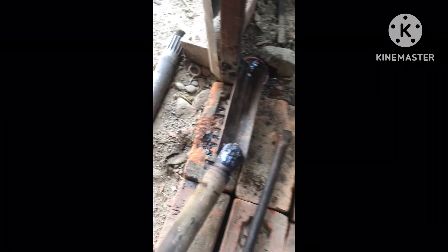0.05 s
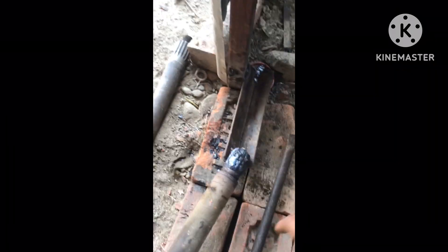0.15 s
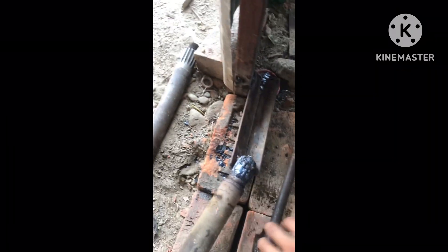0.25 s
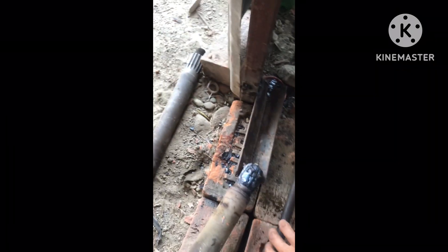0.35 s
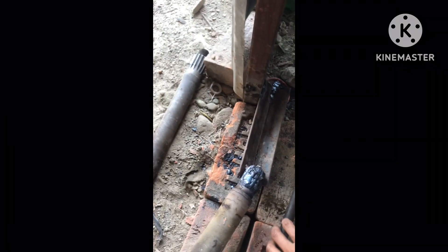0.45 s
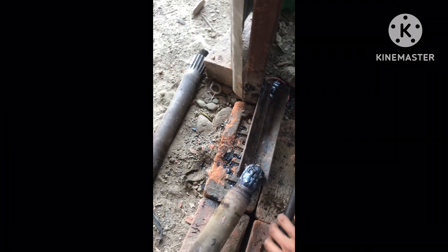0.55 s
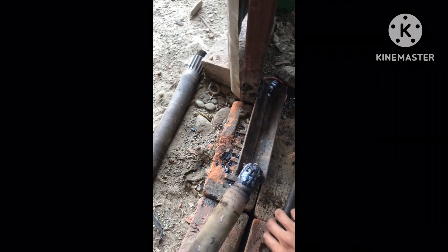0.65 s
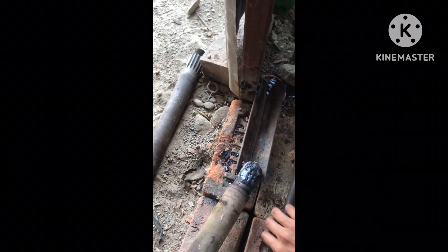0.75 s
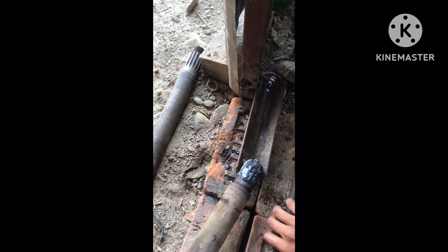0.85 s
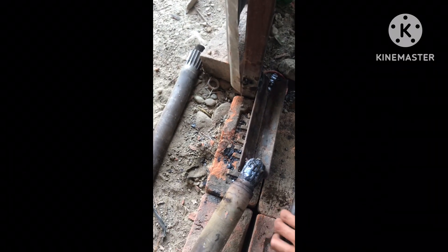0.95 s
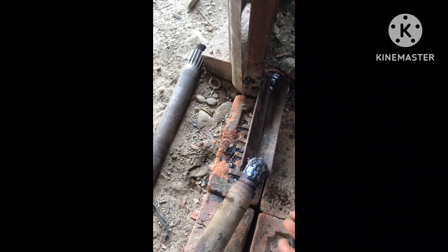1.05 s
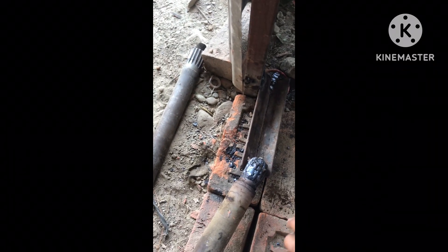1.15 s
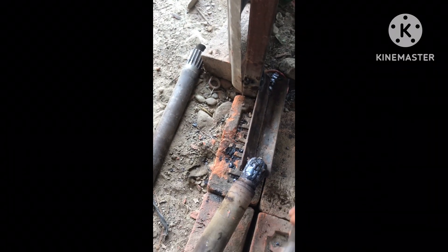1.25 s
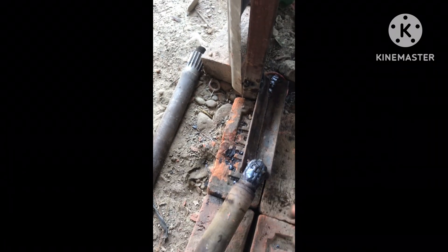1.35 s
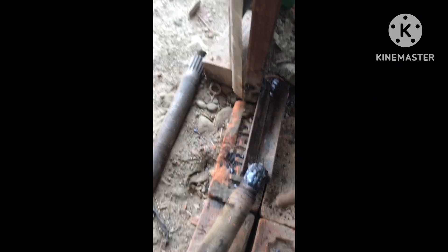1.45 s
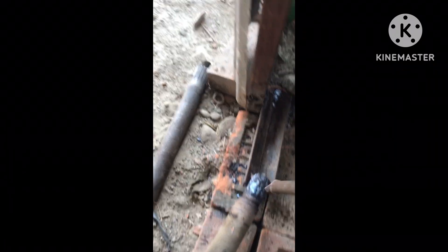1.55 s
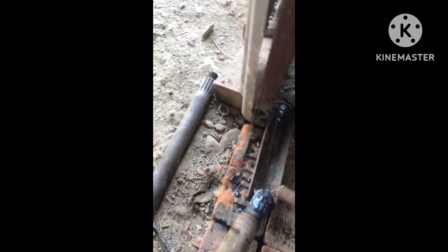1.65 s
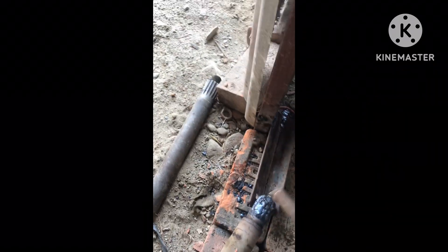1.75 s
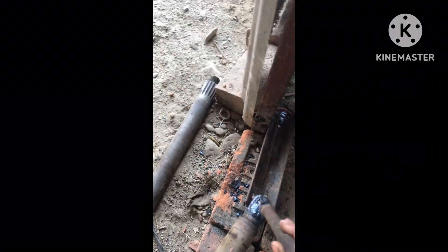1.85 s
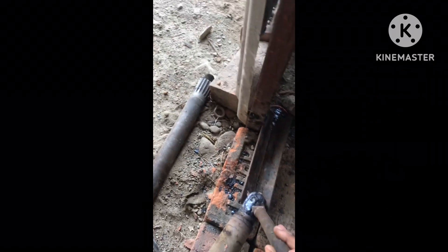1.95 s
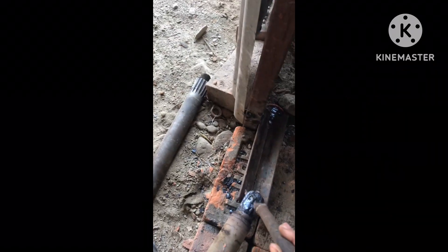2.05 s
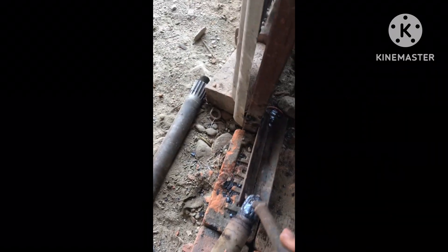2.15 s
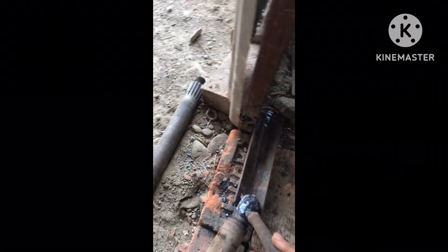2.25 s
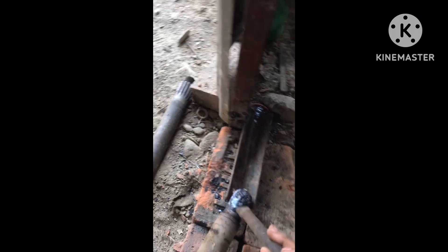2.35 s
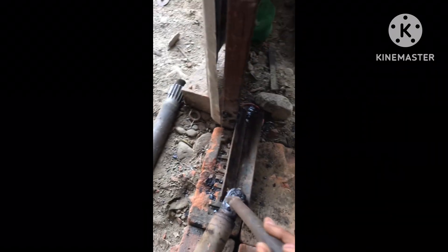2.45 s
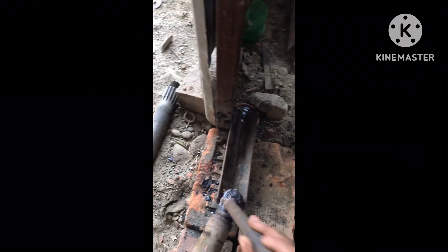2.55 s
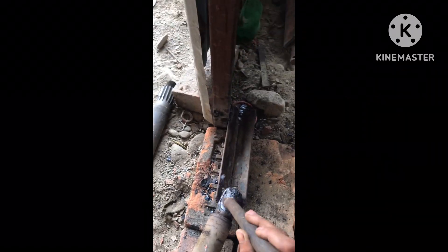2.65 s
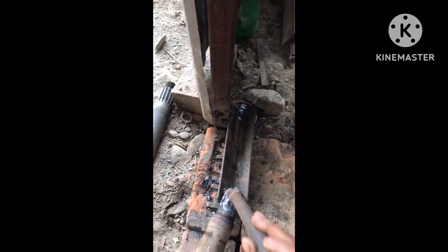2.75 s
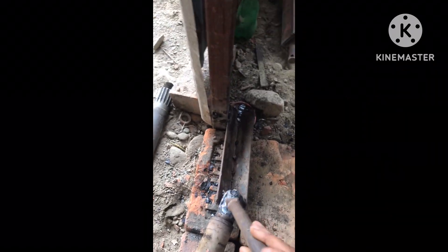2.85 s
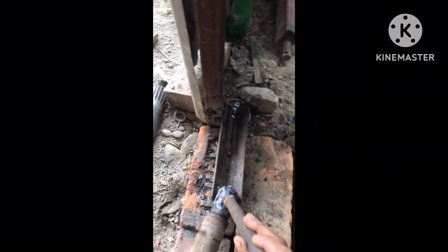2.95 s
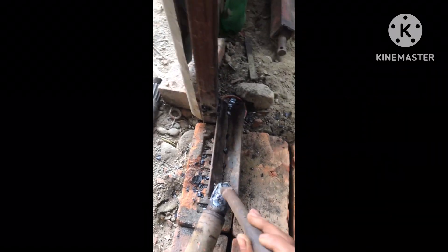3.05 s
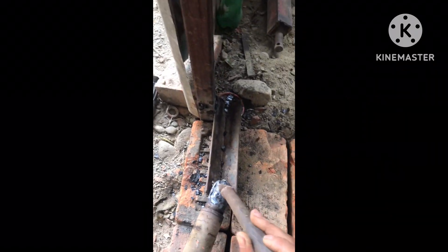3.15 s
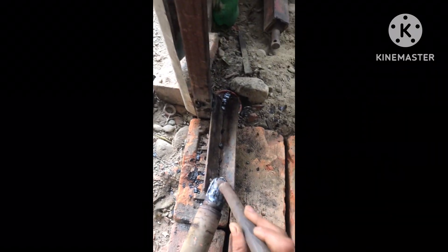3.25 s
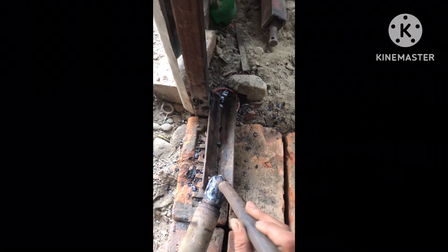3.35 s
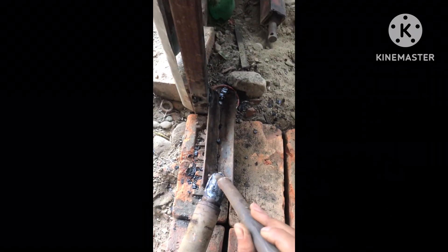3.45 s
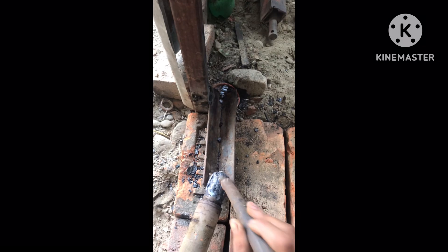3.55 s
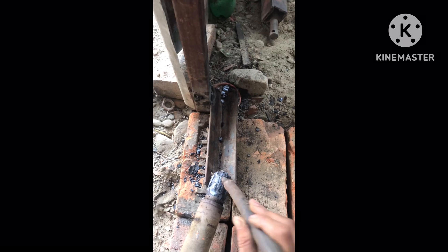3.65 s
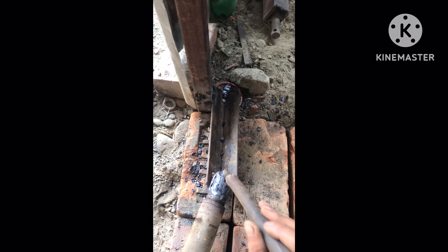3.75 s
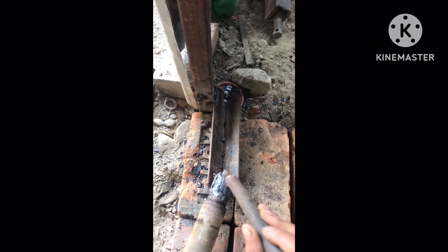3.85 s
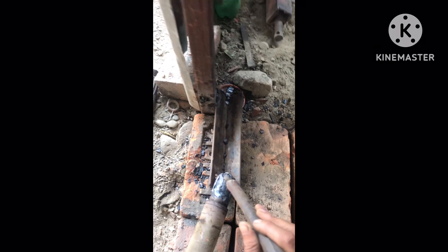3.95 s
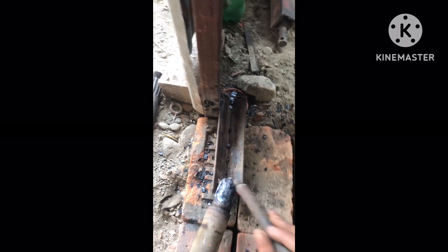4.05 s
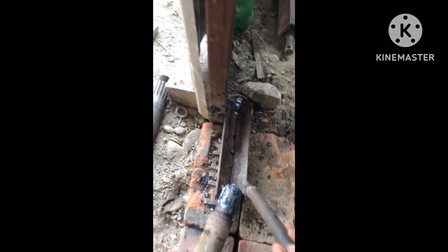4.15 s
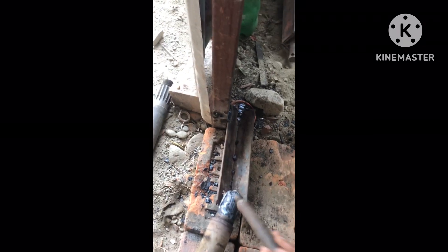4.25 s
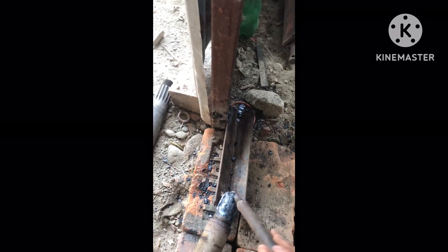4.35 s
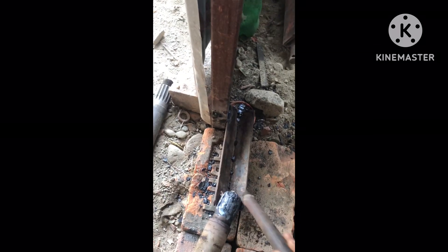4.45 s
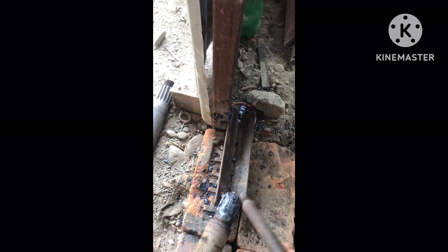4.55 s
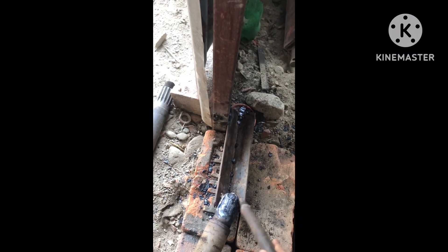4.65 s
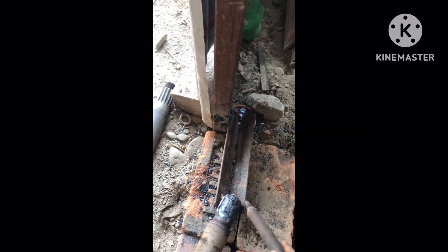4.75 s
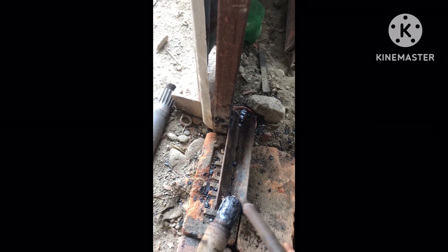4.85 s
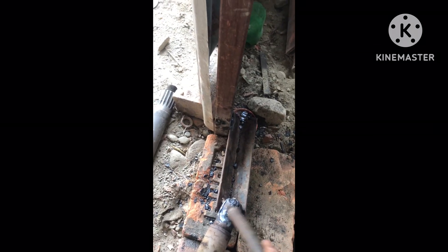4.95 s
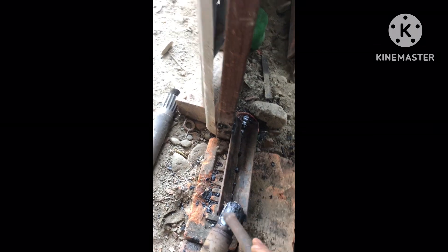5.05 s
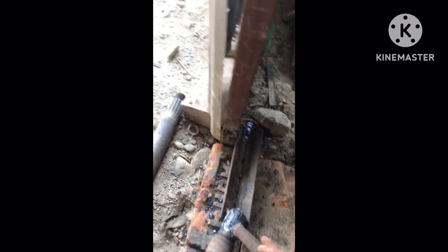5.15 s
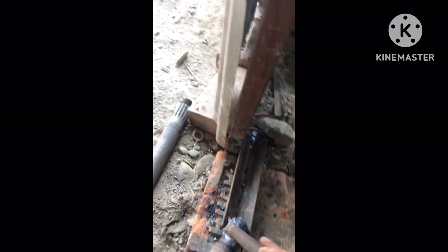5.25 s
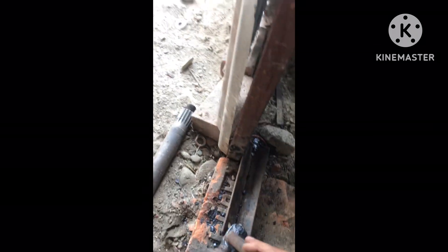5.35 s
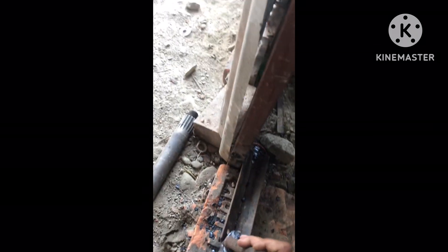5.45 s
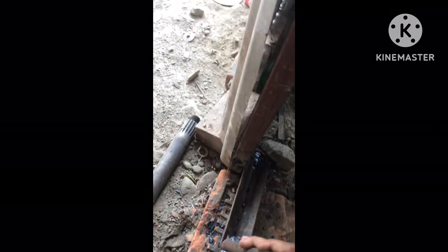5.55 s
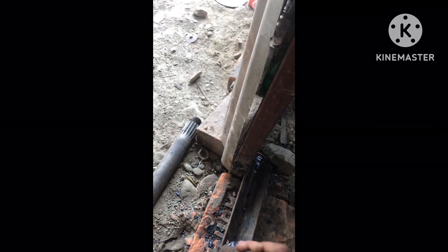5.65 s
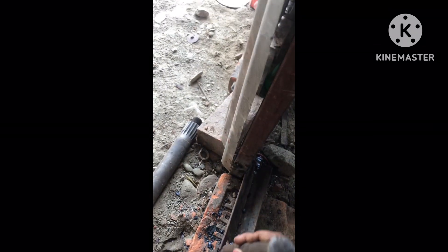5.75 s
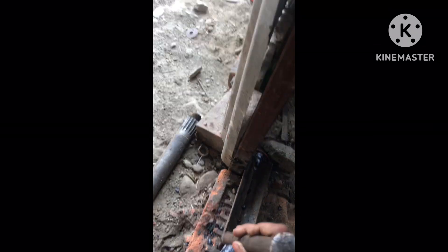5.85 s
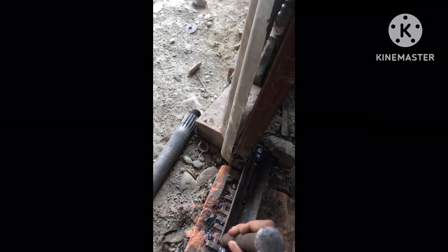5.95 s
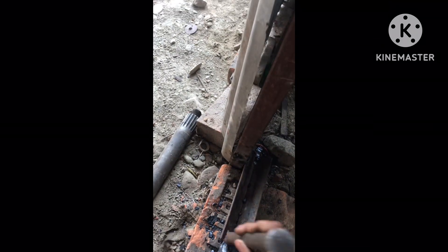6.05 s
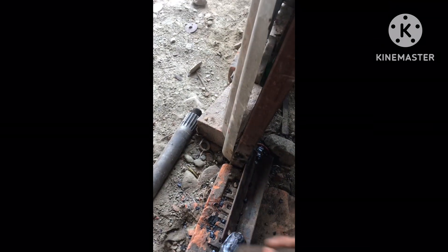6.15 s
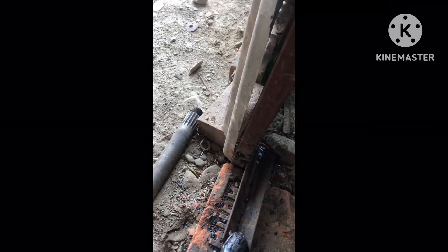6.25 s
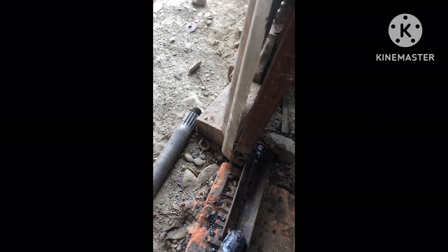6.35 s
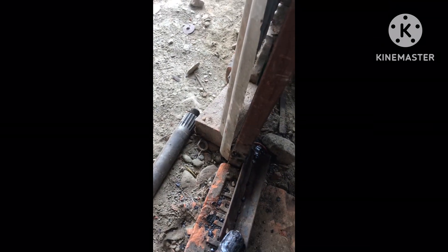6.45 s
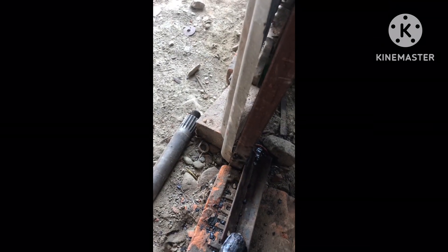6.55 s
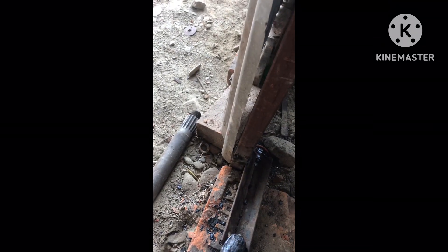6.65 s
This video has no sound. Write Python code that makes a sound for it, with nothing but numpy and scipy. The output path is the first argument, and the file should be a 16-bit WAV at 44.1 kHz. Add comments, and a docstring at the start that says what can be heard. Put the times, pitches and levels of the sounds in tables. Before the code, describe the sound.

A steel rod strikes slag off a welded pipe with sharp, ringing metal blows, then drops onto bricks, over a low machine hum.

```python
"""In a workshop, close to the microphone, a steel rod is picked up and jabbed at a fresh weld on a pipe
that lies on bricks. Glancing blows ping and leave the rod ringing; firm ones crash longer, lower and
brighter and overload the microphone. Slag patters down, and at last the rod is dropped on the bricks.
Machines hum and rumble behind."""
import sys
import numpy as np
from scipy import signal
from scipy.fft import rfft, irfft, next_fast_len
from scipy.io import wavfile
from scipy.ndimage import map_coordinates

SR = 44100
rng = np.random.default_rng(int(sys.argv[2]) if len(sys.argv) > 2 else 0)


def waveform_to_disk(signal):
    """Save audio, clipped to [-1, 1], as 16-bit WAV at the path in sys.argv[1]."""
    frames = np.transpose(np.atleast_2d(signal))
    scaled = np.clip(frames, -1, 1) * 32767
    samples = np.round(scaled).astype(np.int16)
    wavfile.write(sys.argv[1], SR, samples)


N = 295911
TIME_S = np.arange(N) / SR
AGE_S = TIME_S[:SR]   # since a contact

# (glancing, square on)
FAVOURED_HZ, CRASH_T60_S, CRASH_TREBLE_DB = (2819, 2284), (0.05, 0.2), (-11, 7)
SPLINTER_DB, PING_DB = (-51, -9), (-3, -10)
# blows: t/s, strength/dB, firmness (0 glancing, 1 square on), slag crack/dB, low pipe ring/dB,
# rod low/dB, rod high/dB, rod lengthwise/dB
WELD_BLOWS = [(1.932, -9, 0, 3, -28, -21, -15, -29), (2.259, -8, 0.21, 9, -21.5, -19, -18.5, -21),
              (2.621, -5, 0.26, -17, -22.5, -19.5, -10.5, -14.5),
              (2.934, -4.5, 0.39, 16, -19, -13.5, -15, -27), (3.263, -4, 0.33, 7, -27.5, -4, -11.5, -14.5),
              (3.623, -2.5, 0.76, -3, -31, -11, -29, -23.5), (3.956, -4, 0.85, 0, -25.5, -18, -20, -29.5),
              (4.308, -4.5, 0.91, 4, -21.5, -9.5, -28, -40), (4.653, -4, 0.79, 8, -39, -13.5, -30, -25.5),
              (5.029, -5.5, 0.87, -12, -20, -20, -17.5, -33),
              (5.403, -9.5, 0.72, -19, -16.5, -12.5, -22, -28),
              (5.683, -3.5, 0.089, 6, -24, -2, -12.5, -11), (5.985, -9, 1, -2, -12.5, -1, -13, -28.5)]

def blows():
    """The tip cracks slag and rings pipe and rod; firmer contact crashes longer and pings lower."""
    work, rod = np.zeros(N), np.zeros(N)
    bank_hz, bank = dense_modes(t60_at_2k_s=0.26, count=190)
    for start_s, strength_db, firmness, crack_db, pipe_db, low_db, high_db, lengthwise_db in WELD_BLOWS:
        t60_s = between(CRASH_T60_S, firmness)
        favoured_hz = between(FAVOURED_HZ, firmness)
        treble_db = between(CRASH_TREBLE_DB, firmness)
        hardness = from_db(at_hz([(2800, 1.2), (3700, 0.76 * treble_db), (9000, treble_db)], bank_hz))
        crash = (rng.standard_normal(len(bank)) * hardness) @ bank * decay(t60_s)
        crack = burst(SLAG_SPECTRUM, t60_s=0.0022) * from_db(crack_db - 4.5)
        splinters = burst(SLAG_SPECTRUM, t60_s=0.16) * from_db(between(SPLINTER_DB, firmness))
        crumble = burst(CRASH_SPECTRUM, t60_s=0.11) * from_db(-7.5)
        clank = pipe_ring(favoured_hz, t60_scale=t60_s / 0.3) * from_db(-12)
        ping = mode(favoured_hz, t60_s=0.028) * from_db(between(PING_DB, firmness))
        add(work, start_s, crack + (crash + splinters + crumble + clank + ping) * from_db(strength_db))
        add(work, start_s, low_pipe_ring() * from_db(pipe_db))
        bending = held_rod_modes(low_db, high_db, t60_scale=0.66)
        add(rod, start_s, ring(bending, spread_db=3.8) + lengthwise_ring() * from_db(lengthwise_db))
    return work, rod

# crash of slag, pipe and bed: f/Hz, level/dB
CRASH_SPECTRUM = [(300, -33), (600, -22), (800, -19.5), (1050, -7), (1400, -10), (1900, -10.5), (2600, 3.5),
                  (3150, -10.5), (3700, -3.5), (4300, -17), (5000, -9.5), (6000, -19), (9000, -16),
                  (15500, -19.5)]

def dense_modes(t60_at_2k_s, count):
    """Modes of pipe and bed, sparser and shorter in the treble: pitches, and one decaying sine a row."""
    place = (np.arange(count) + rng.random(count)) / count
    hz = 780 + 14800 * place ** 1.35
    gains = from_db(at_hz(CRASH_SPECTRUM, hz)) * (hz / 2000) ** 0.13
    gains /= np.linalg.norm(gains)
    t60_s = t60_at_2k_s * (hz / 2000) ** -0.15
    return hz, np.array([gain * mode(f, t60) for gain, f, t60 in zip(gains, hz, t60_s)])

# pipe and its angle iron: f/Hz, level/dB, base t60/s
PIPE_MODES = [(1594, -8.5, 0.48), (1780, 1.5, 0.068), (2186, 11, 0.026), (2200, 1.5, 0.18),
              (2262, 3, 0.057), (2350, 4, 0.058), (2428, -14.5, 0.057), (2542, 1, 0.23), (2621, -11, 0.36),
              (2658, 1, 0.2), (2694, 2, 0.045), (3777, 4.5, 0.15), (3800, -10.5, 0.41), (4730, -8, 0.15),
              (4886, -1, 0.19), (5000, -2.5, 0.08)]

def pipe_ring(favoured_hz, t60_scale):
    """The point of contact picks out the pipe modes near one pitch."""
    modes = [(hz, db + 13 * np.exp(-((hz - favoured_hz) / 200) ** 2), t60_s * t60_scale)
             for hz, db, t60_s in PIPE_MODES]
    return ring(modes, spread_db=2)

# lowest pipe modes: f/Hz, level/dB, t60/s
LOW_PIPE_MODES = [(965, -9, .09), (1068, -7, .12), (1119, -1.5, .22), (1160, -6, .12)]

def low_pipe_ring():
    """The struck pipe rings near 1 kHz."""
    return ring(LOW_PIPE_MODES, spread_db=5.5)

# rod, bending: f/Hz, level/dB, base t60/s
BENDING_MODES = [(2548, -3, .24), (4843, 0, .19), (7704, -1, .15), (11001, -2, .15), (14628, 3, .13),
                 (15220, -9, .1)]

def held_rod_modes(low_db, high_db, t60_scale):
    """Contact sets the balance of low and high; the grip muffles the lowest mode and shortens all."""
    colour = [(2548, low_db - 7), (4843, low_db),
              (7704, high_db - 1), (11001, high_db - 1), (14628, high_db)]
    return [(hz, db + at_hz(colour, hz), t60_s * t60_scale) for hz, db, t60_s in BENDING_MODES]

# rod, lengthwise: f/Hz, level/dB, t60/s
LENGTHWISE_MODES = [(8375, 0, .5), (8378, -1, .15)]

def lengthwise_ring():
    """The long thin ring that runs along the rod."""
    return sum(from_db(db) * mode(hz, t60_s) for hz, db, t60_s in LENGTHWISE_MODES)

# light touches and rebounds: t/s, clack/dB, pipe/dB, rod/dB
ROD_TOUCHES = [(0.9446, -41, -57, -36), (1.0813, -26, -50, -26.5), (1.1532, -32, -45, -31),
               (2.6954, -22, -23.5, -23), (3.047, -36, -50, -39), (5.415, -5, -20, -20),
               (5.438, -3, -22, -25), (5.471, -32, -44, -30), (5.7278, 0.5, -34, -35),
               (5.7585, -23, -34, -28), (6.0235, -1, -26, -26)]

def touches():
    """The rod grazes or bounces on the pipe; light touches stir mainly its high bending modes."""
    out = np.zeros(N)
    for start_s, clack_db, pipe_db, rod_db in ROD_TOUCHES:
        tick = burst(SLAG_SPECTRUM, t60_s=0.068) * from_db(0.27 * clack_db - 21.5)
        clack = filtered(burst(CRASH_SPECTRUM, t60_s=0.067), 2300, "low") * from_db(clack_db - 7)
        modes = held_rod_modes(low_db=0.75 * clack_db - 2.5, high_db=-0.76, t60_scale=0.5)
        bending = ring(modes, spread_db=2.5) * from_db(rod_db)
        clank = pipe_ring(favoured_hz=3500, t60_scale=1.133) * from_db(-14.5)
        free_ping = mode(2840, t60_s=0.36) * from_db(-11 - 0.41 * clack_db)   # tip off the pipe
        add(out, start_s, tick + clack + bending + (clank + free_ping) * from_db(pipe_db))
    return out

# bricks and loose iron: f/Hz, level/dB, t60/s
BRICK_MODES = [(385, 0, 0.025), (515, 3, 0.014), (670, 3.5, 0.015), (840, 3, 0.011), (992, -14.5, 0.16),
               (1110, -0.5, 0.01), (1638, 0.5, 0.057), (2017, -7, .11), (2160, -16, 0.084),
               (4500, -26, 0.25)]
# rod landings: t/s, knock/dB, ring/dB
LANDINGS = [(6.584, -14, -19), (6.618, -1, -11), (6.676, -17, -24)]

def dropped_rod():
    """One end lands, then the other: dull knocks on brick while the freed rod rings on."""
    out = np.zeros(N)
    soft_contact = [(2500, 2), (4850, -0.5), (7700, -9), (15000, -10)]   # brick favours low modes
    free_modes = [(hz, db + at_hz(soft_contact, hz), t60_s * 2.9) for hz, db, t60_s in BENDING_MODES]
    for start_s, knock_db, ring_db in LANDINGS:
        bricks = ring(BRICK_MODES, spread_db=1)
        rod = ring(free_modes, spread_db=1) + lengthwise_ring() * from_db(-18)
        knock = filtered(bricks + burst(CRASH_SPECTRUM, t60_s=0.029) * from_db(-7), 8900, "low")
        chatter = from_db(2 * drift(83)[:SR])   # rod trembling against brick
        add(out, start_s, knock * from_db(knock_db) + rod * chatter * from_db(ring_db - 9))
    return out

DRAG_START_S, DRAG_END_S, DRAG_RELEASE_DB_PER_S = 0.94, 1.19, 450
DRAG_LOW_DB, DRAG_HIGH_DB = (-49, -25), (-49.5, -37)   # (start, end)

def scrape():
    """The rod is dragged off the bricks, pressing ever harder; grit catches it and keeps it ringing."""
    progress = (TIME_S - DRAG_START_S) / (DRAG_END_S - DRAG_START_S)
    low_db, high_db = between(DRAG_LOW_DB, progress), between(DRAG_HIGH_DB, progress)
    catches = (rng.random(N) < 1200 / SR) * rng.standard_normal(N)
    out = unit_rms(filtered(catches, 11000, "high")) * from_db(high_db - 4)
    for hz, db, t60_s in BENDING_MODES:
        ringing = unit_rms(signal.fftconvolve(catches, mode(hz, t60_s * 1.1))[:N])
        level_db = low_db + 0.5 - 9 * np.log2(hz / BENDING_MODES[0][0]) if hz < 6000 else high_db
        out += ringing * from_db(db + level_db - 4 + 1.8 * drift(29.6))
    release = from_db(-DRAG_RELEASE_DB_PER_S * np.maximum(TIME_S - DRAG_END_S, 0))
    return out * (TIME_S > DRAG_START_S) * release

# tick of slag: f/Hz, level/dB
SLAG_SPECTRUM = [(1500, -32), (4000, -3.5), (8000, -12), (13500, -1), (16000, 1)]
# larger chips landing: t/s, level/dB
CHIP_FALLS = [(0.406, -25), (0.5531, -29), (2.324, -24), (2.4149, -19.5), (2.521, -18), (2.745, -15),
              (2.8785, -18), (3.096, -22), (3.1883, -21), (3.2017, -22)]
# dust spills: peak t/s, level/dB, 60 dB rise/s, t60/s
DUST_SPILLS = [(1.59, -48, 0.36, 0.11), (2.37, -50, 0.083, 1), (2.72, -34, .05, 0.69)]

def slag():
    """Chips land with dry ticks; spills swell and trickle away as fine grains with a few crumbs."""
    chips = np.zeros(N)
    for start_s, db in CHIP_FALLS:
        add(chips, start_s, burst(SLAG_SPECTRUM, t60_s=0.022) * from_db(db - 8.5))
    flow = sum(from_db(db - 60 * np.maximum((peak_s - TIME_S) / rise_s, (TIME_S - peak_s) / t60_s))
               for peak_s, db, rise_s, t60_s in DUST_SPILLS)
    dust = unit_rms(filtered(grains(per_s=1200, spread_db=4), 8000, "high"))
    tinkle = filtered(burst(SLAG_SPECTRUM, t60_s=0.025), 8500, "high")
    crumbs = unit_rms(signal.fftconvolve(grains(per_s=130, spread_db=7), tinkle)[:N])
    return chips + flow * (dust + crumbs)

# room decay: f/Hz, t60/s
ROOM_DECAY = [(300, 0.22), (1100, 0.46), (2500, 0.13), (5000, 0.29), (9000, 0.21), (16000, 0.19)]

def reflections(x):
    """Diffuse workshop reflections build up over milliseconds and last longest near 1 kHz."""
    edges_hz = np.geomspace(200, 18000, 10)
    tail = np.zeros(SR)
    for low_hz, high_hz in zip(edges_hz, edges_hz[1:]):
        band = filtered(rng.standard_normal(SR), (low_hz, high_hz), "band")
        tail += band * decay(at_hz(ROOM_DECAY, np.sqrt(low_hz * high_hz)))
    tail *= 1 - np.exp(-AGE_S / 0.012)
    return signal.fftconvolve(x, tail / np.linalg.norm(tail))[:N]

# background swell: t/s, level/dB
SWELL = [(0.0, -33.5), (1.1, -34.5), (2.3, -30.5), (2.84, -33.5), (3.2, -31), (4.58, -37), (5.0, -31.5),
         (5.16, -31.5), (6.5, -27)]
# hums: f/Hz, level before/dB, level after/dB, mid-change t/s, change length/s, relative pitch waver
MACHINE_HUMS = [(76, -31.5, -37.5, 2.74, 0.43, 0.0047), (92.3, -34.5, -45, 1, .3, 0.019),
                (134.5, -46, -36.5, 3.54, 1.4, .012), (280, -53, -39.5, 5, 0.62, 0.01064)]
# machine rumble: f/Hz, level/dB
RUMBLE_SPECTRUM = [(13, -46), (22, -25), (60, -1), (81, 2.5), (108, -4.5), (140, -3), (166, -9),
                   (222, -11.5), (277, -10.5), (313, -15), (494, -22.5), (600, -25), (780, -35),
                   (1320, -120)]
# far noise: f/Hz, level/dB
WASH_SPECTRUM = [(240, -18.5), (400, -0.5), (512, -11), (655, -1), (719, -4.5), (1140, -2), (3070, -13.5),
                 (4880, -20.5), (12300, -32.5), (14400, -24.5), (16000, -53)]

def machines():
    """Wavering hums over a low rumble and a wash of far noise, all swelling together."""
    level_db = np.interp(TIME_S, *np.transpose(SWELL))
    swell_db = level_db - level_db.mean()
    hums = np.zeros(N)
    for hz, before_db, after_db, change_s, length_s, waver in MACHINE_HUMS:
        phase = 2 * np.pi * np.cumsum(hz * (1 + waver * drift(12))) / SR
        hum_db = between((before_db, after_db), 0.5 + (TIME_S - change_s) / length_s)
        hums += np.sqrt(2) * np.sin(phase) * from_db(hum_db + 0.47 * swell_db + 1.27 * drift(14))
    rumble = filtered(noise(RUMBLE_SPECTRUM, N), (70, 86), "bandstop") * from_db(-30)
    deep = signal.sosfiltfilt(signal.butter(2, 100, fs=SR, output="sos"), rumble)
    upper = rumble - deep
    wash = noise(WASH_SPECTRUM, N) * from_db(-39.5 + 0.62 * swell_db)
    return hums + deep * from_db(0.39 * swell_db) + upper * from_db(1.3 * swell_db) + wash

def ring(modes, spread_db):
    """Struck modes; each blow lands elsewhere and shares its energy differently."""
    chance_db = spread_db * rng.triangular(-2, 0, 2, len(modes))
    return sum(from_db(db + chance_db[k]) * mode(hz, t60_s) * (-1) ** k
               for k, (hz, db, t60_s) in enumerate(modes))

def mode(hz, t60_s):
    """One struck mode of height 1."""
    return np.sin(2 * np.pi * hz * AGE_S) * decay(t60_s)

def burst(spectrum, t60_s):
    """Modes too dense to tell apart: decaying noise."""
    return noise(spectrum, SR) * decay(t60_s)

def decay(t60_s):
    """Exponential decay after a contact."""
    return from_db(-60 * AGE_S / t60_s)

def grains(per_s, spread_db):
    """Clicks of uneven size at random moments."""
    sizes = from_db(spread_db * np.minimum(rng.exponential(1, N), 4)) * rng.choice([-1, 1], N)
    return (rng.random(N) < per_s / SR) * sizes

def noise(spectrum, size):
    """Coloured noise, rms 1."""
    padded = next_fast_len(size)
    gains = from_db(at_hz(spectrum, np.fft.rfftfreq(padded, 1 / SR)))
    return unit_rms(irfft(rfft(rng.standard_normal(padded)) * gains, padded)[:size])

def drift(knots_per_s):
    """Smooth random curve, spread about 1."""
    return map_coordinates(rng.standard_normal(1000), [TIME_S * knots_per_s], order=2, mode="wrap")

def filtered(x, hz, kind):
    """Second-order Butterworth filter."""
    return signal.sosfilt(signal.butter(2, hz, kind, fs=SR, output="sos"), x)

def at_hz(points, hz):
    """Read a table on a log-frequency axis."""
    known_hz, values = np.transpose(points)
    return np.interp(np.log(np.maximum(hz, 1)), np.log(known_hz), values)

def between(ends, share):
    """Linear blend, held at the ends."""
    return ends[0] + (ends[1] - ends[0]) * np.clip(share, 0, 1)

def from_db(db):
    """Decibels to gain."""
    return 10 ** (np.asarray(db) / 20)

def unit_rms(x):
    """Scale to rms 1."""
    return x / np.sqrt(np.mean(x ** 2) + 1e-20)

def add(track, start_s, sound):
    """Mix a sound in at a time."""
    start = round(start_s * SR)
    track[start:start + len(sound)] += sound[:N - start]

def scene():
    """Near contacts, their reflections and the machines, in mono."""
    work, rod = blows()
    rod_and_slag = rod + touches() + scrape() + slag() + dropped_rod()
    room = reflections(from_db(-8.5) * work + from_db(-19.5) * rod_and_slag)
    return (work + rod_and_slag + room + machines())[None]

CLIP_LEVEL, CUTOFF_HZ = 1.05, 15700

def record(dry):
    """The blows overload the microphone; the top is cut steeply."""
    clipped = dry / (1 + (dry / CLIP_LEVEL) ** 12) ** (1 / 12)
    return signal.sosfilt(signal.ellip(10, 0.1, 70, CUTOFF_HZ, fs=SR, output="sos"), clipped)

dry = scene()
out = record(dry)
waveform_to_disk(out)
```